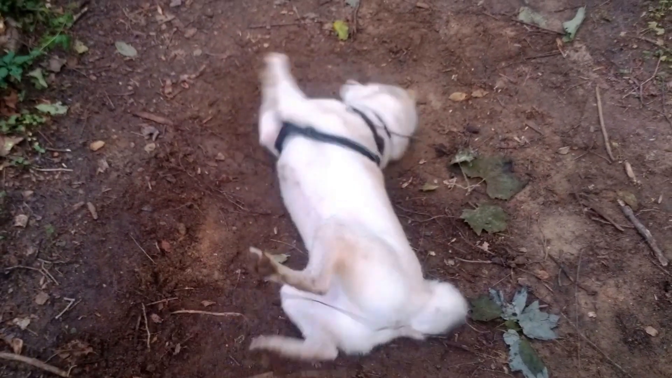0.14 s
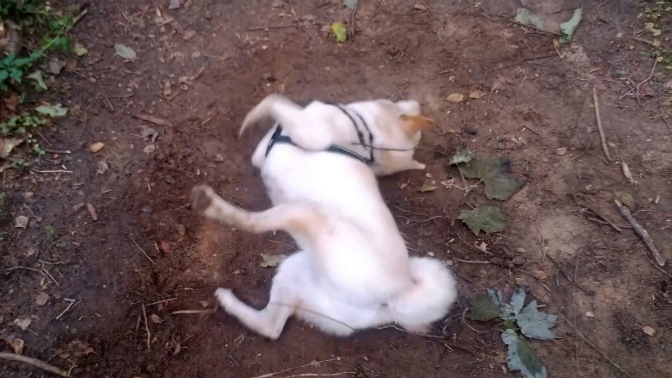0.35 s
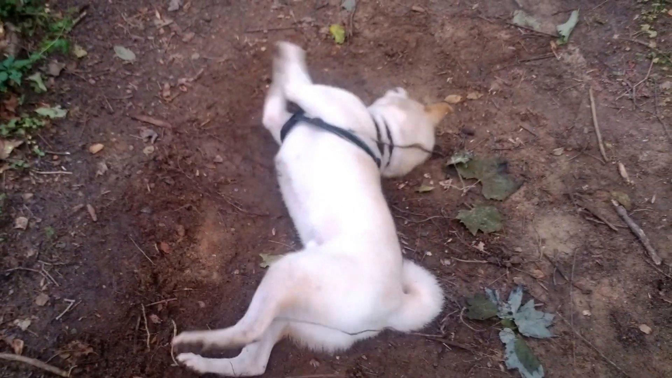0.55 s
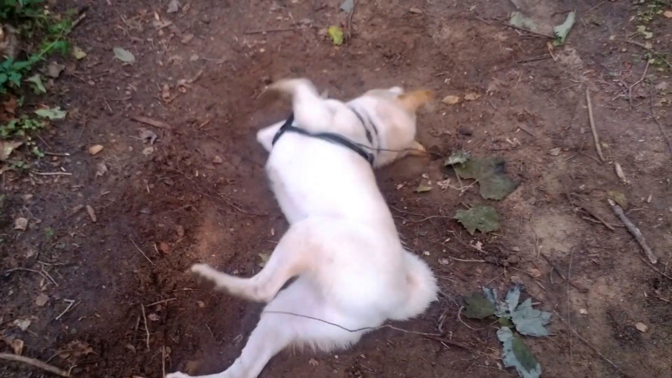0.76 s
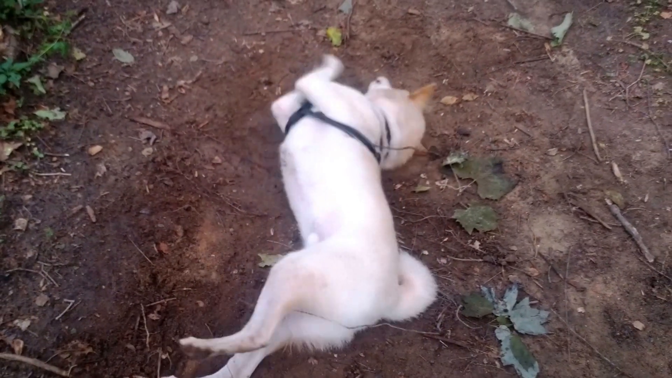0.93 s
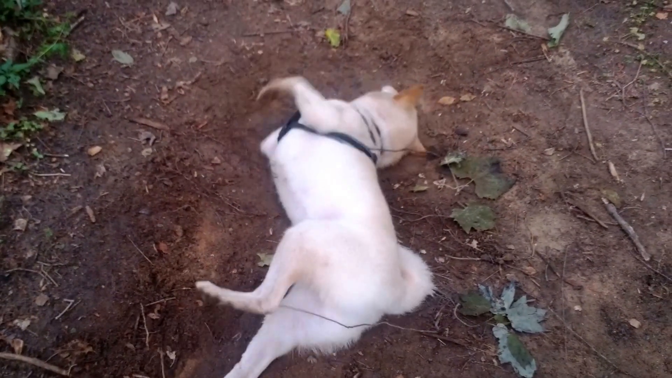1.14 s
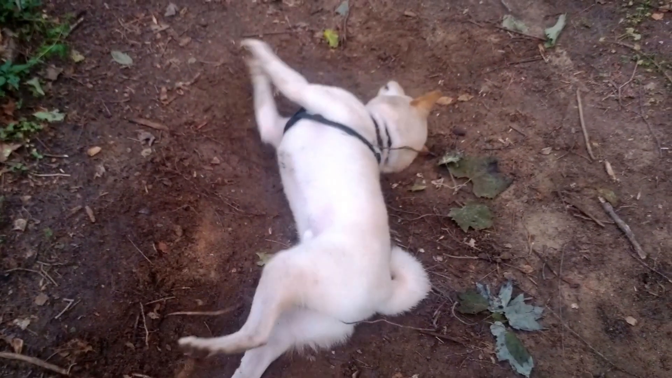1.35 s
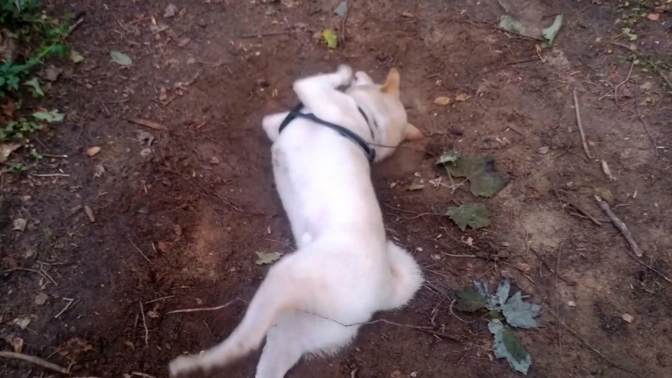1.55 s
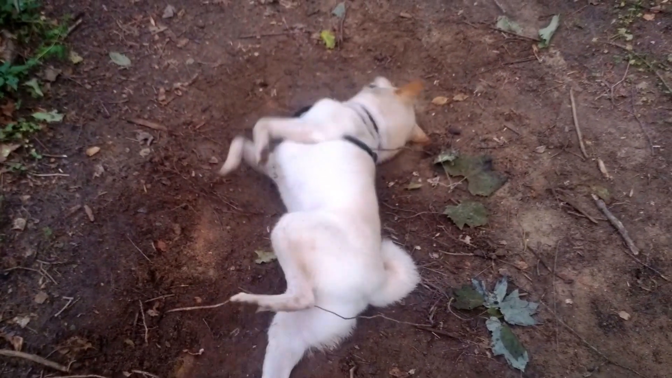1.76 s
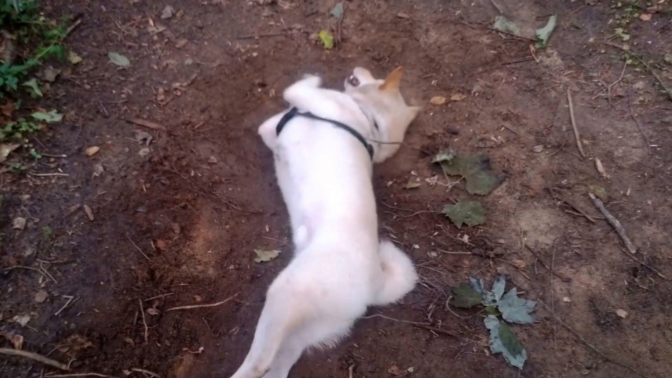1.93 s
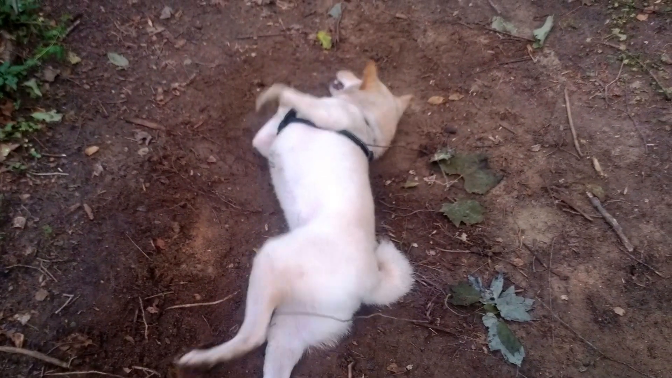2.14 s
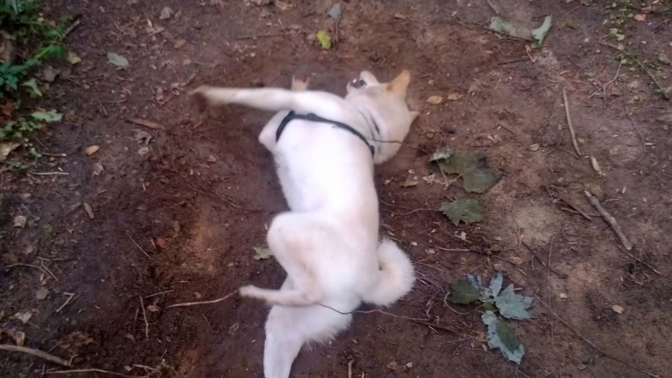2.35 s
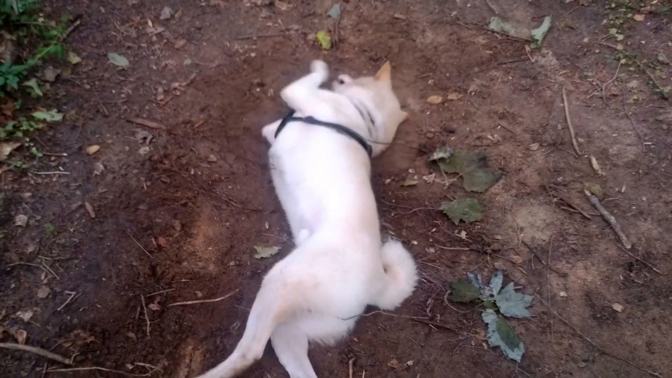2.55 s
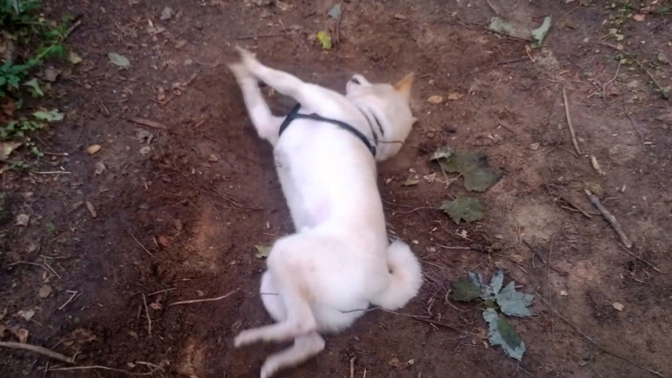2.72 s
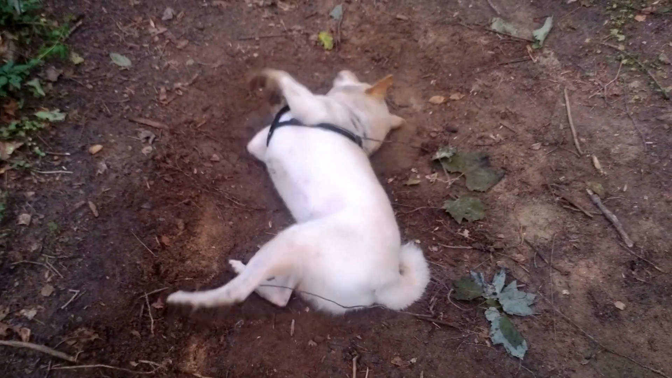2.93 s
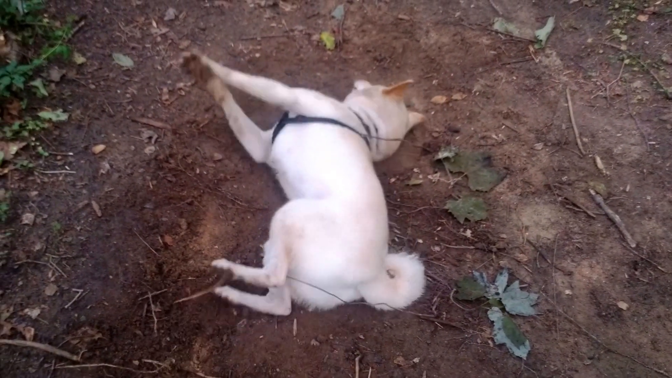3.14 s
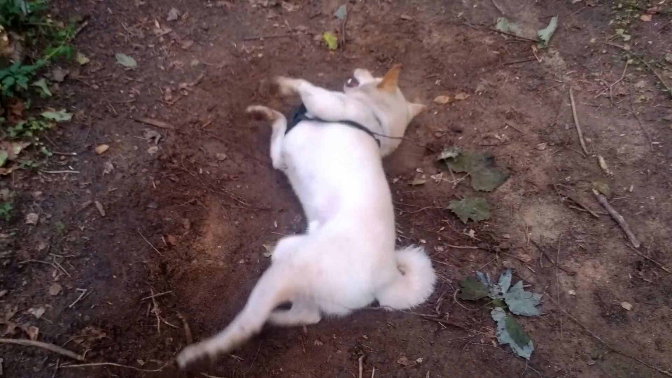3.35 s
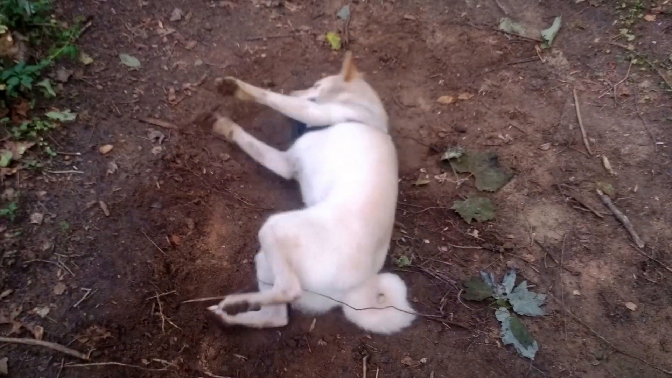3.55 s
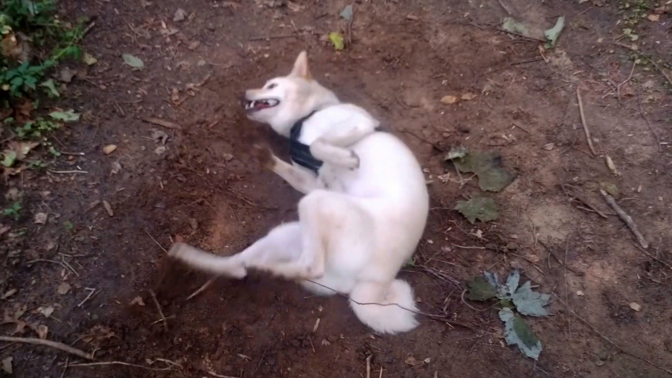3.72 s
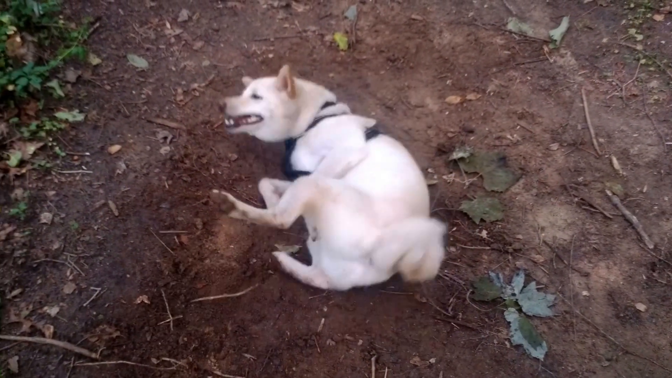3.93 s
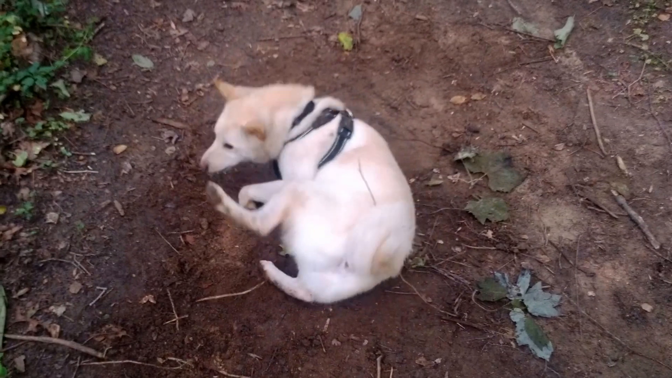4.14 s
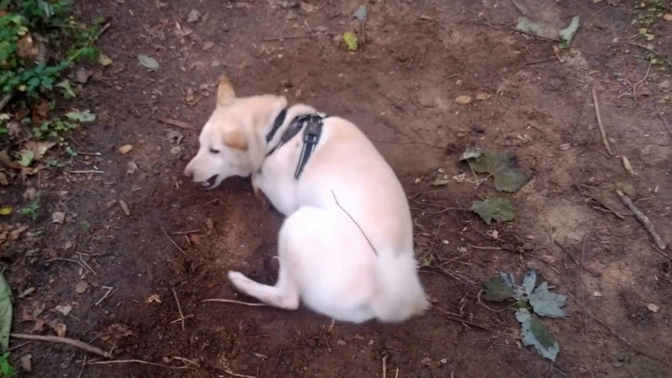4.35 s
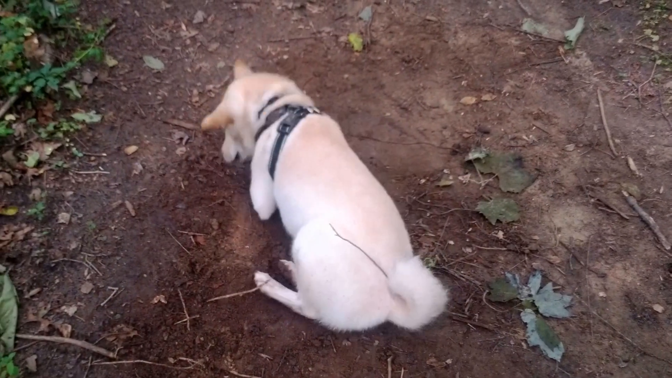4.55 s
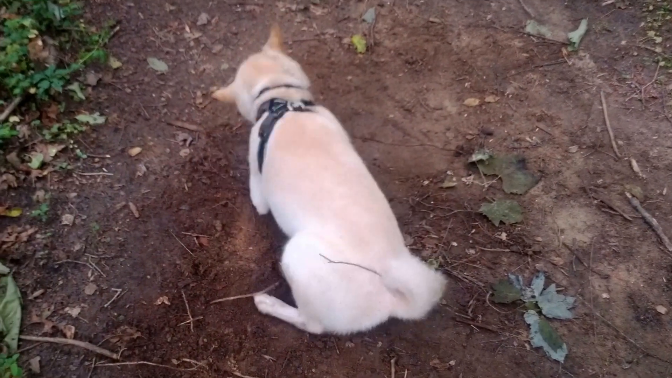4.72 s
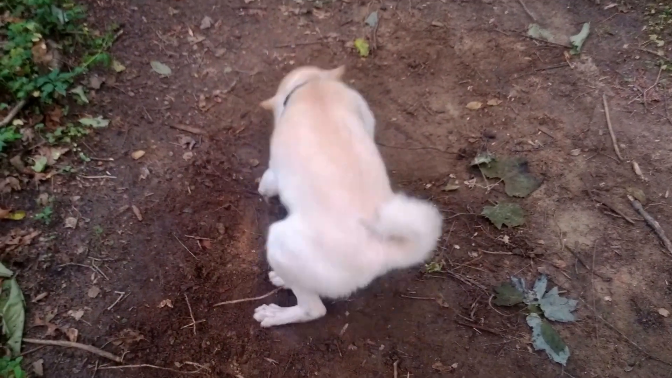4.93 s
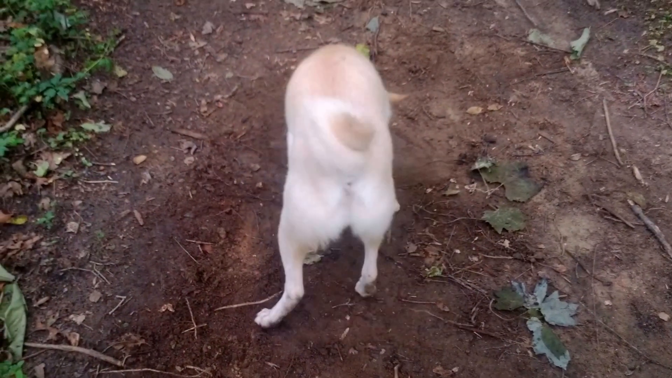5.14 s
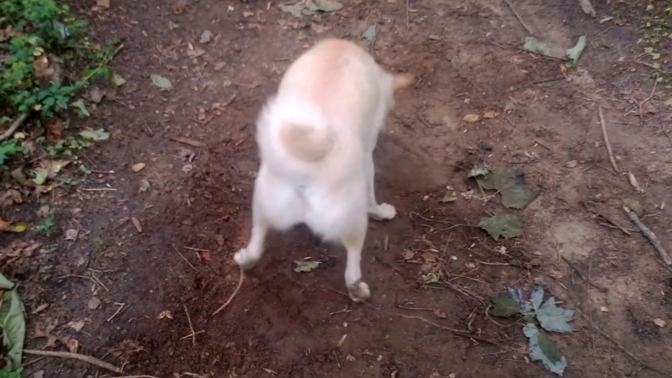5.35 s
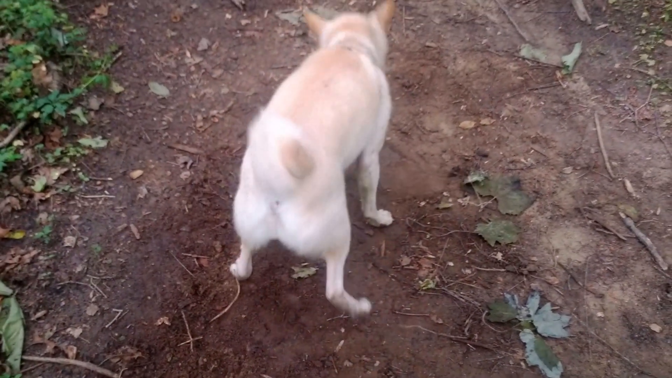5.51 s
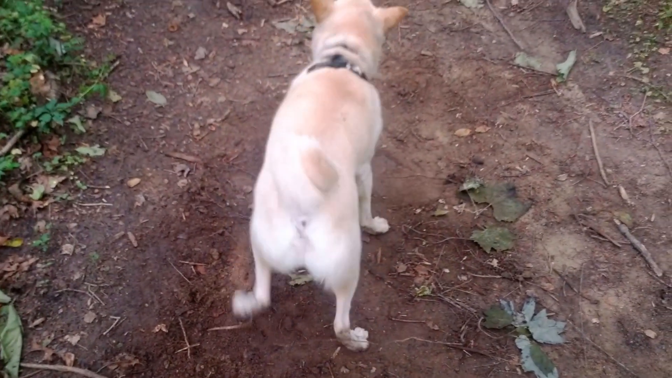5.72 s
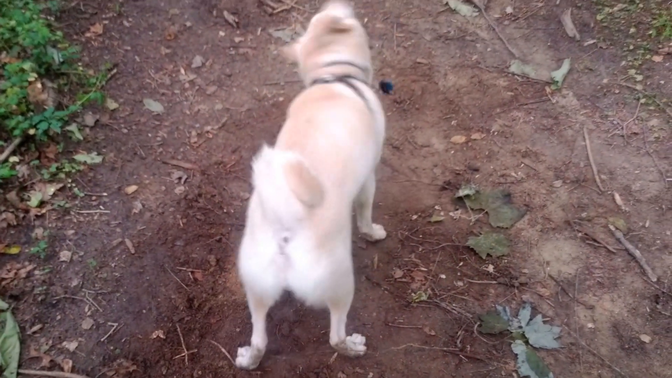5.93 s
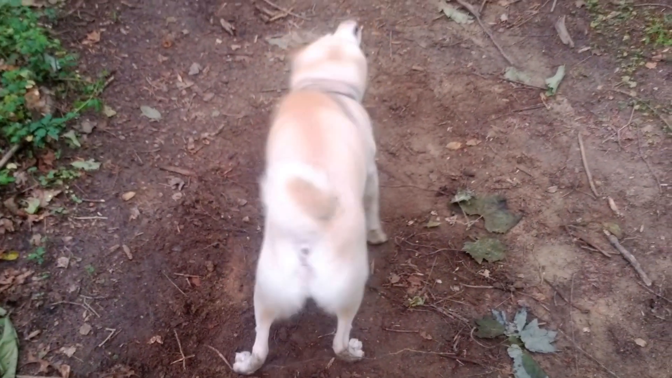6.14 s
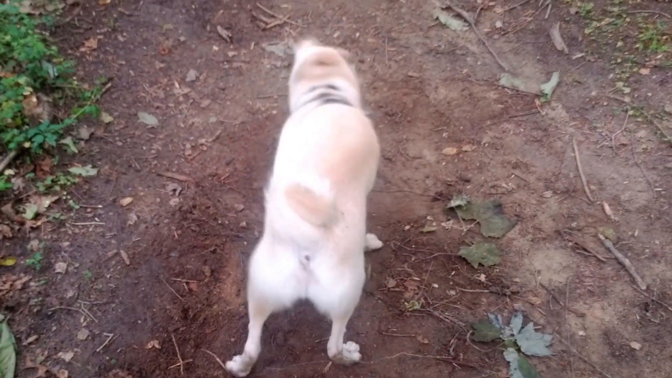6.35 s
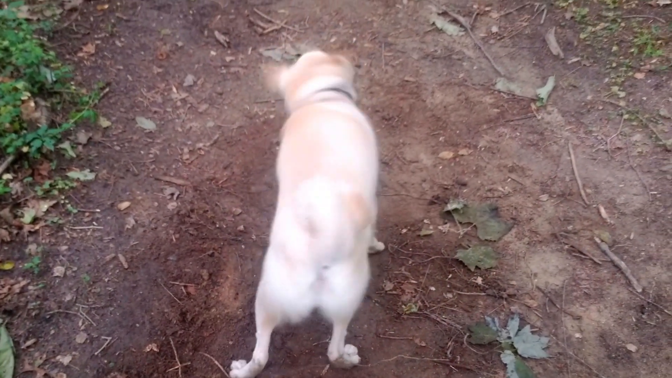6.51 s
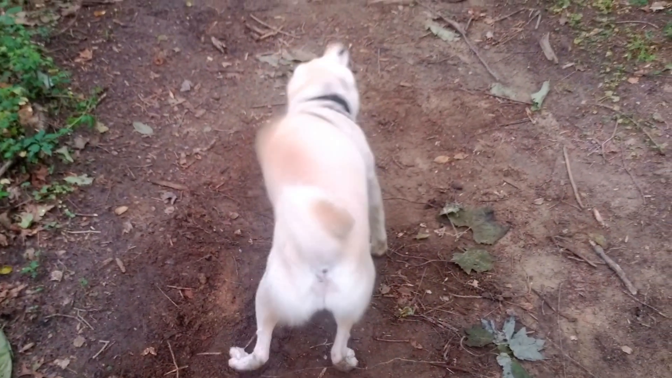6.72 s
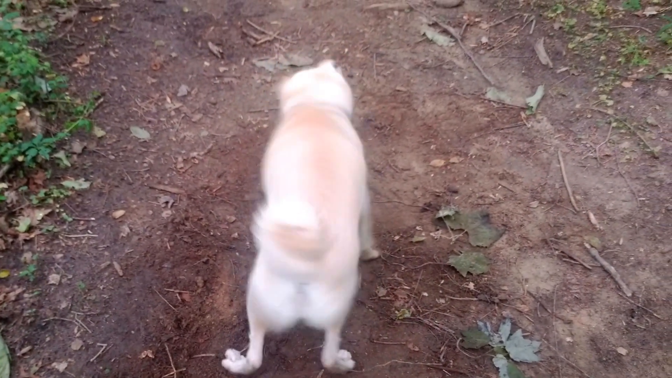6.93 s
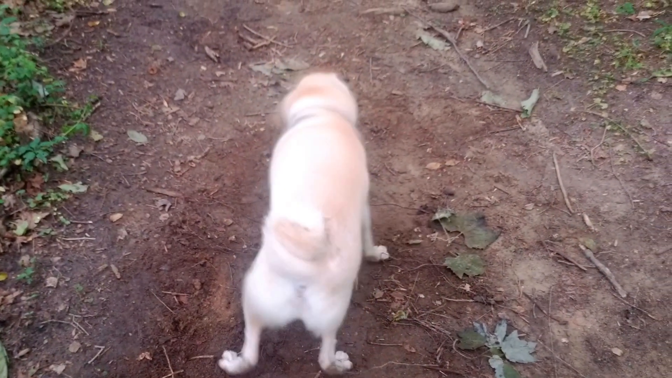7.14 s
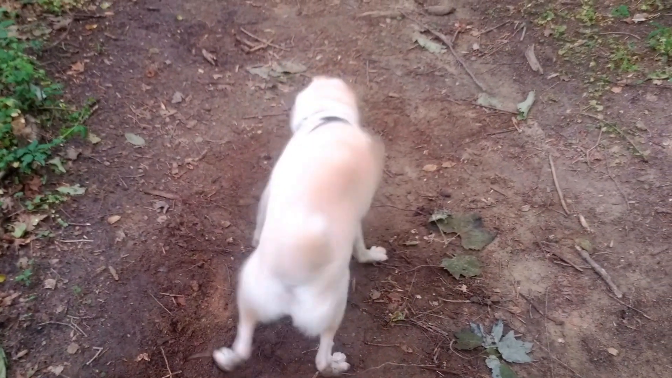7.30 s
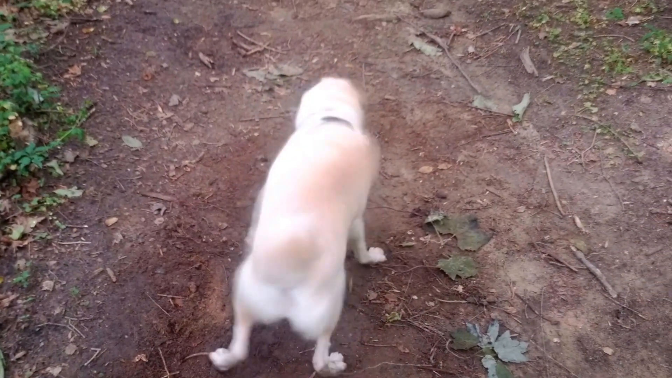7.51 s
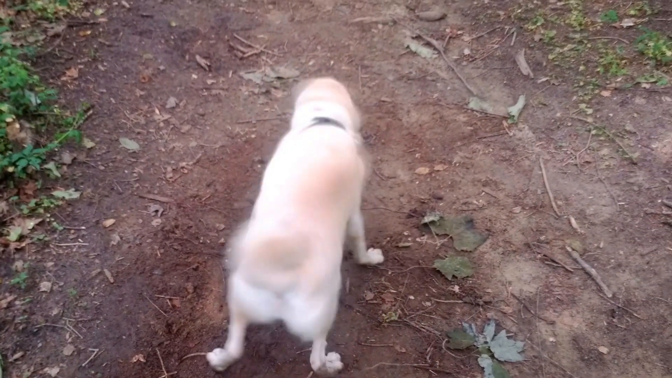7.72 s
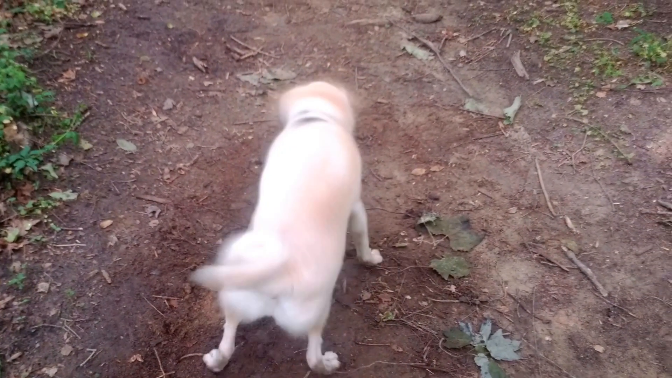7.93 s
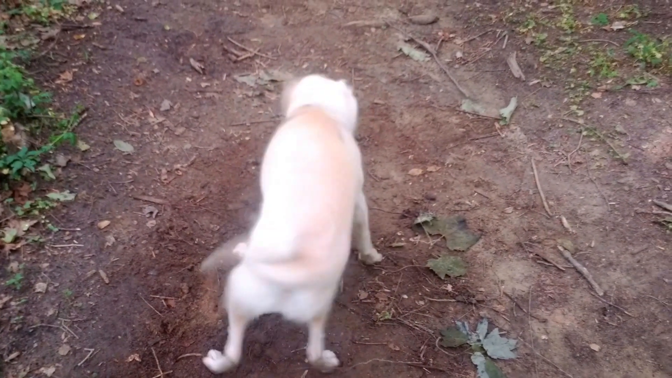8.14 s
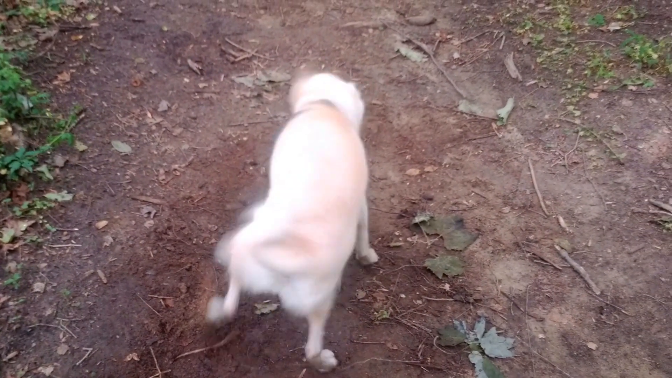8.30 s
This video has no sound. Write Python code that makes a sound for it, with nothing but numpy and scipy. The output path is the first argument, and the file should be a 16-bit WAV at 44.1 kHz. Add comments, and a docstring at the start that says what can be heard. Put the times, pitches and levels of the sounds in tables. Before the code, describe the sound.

Rough coat scuffs over dirt, small tag tinks and snorty puffs outdoors, followed by sharp, rhythmic rattling clacks of a dog's metal collar fittings.

```python
"""You hear a coat scraping over soil, twigs snapping, paws thumping, a collar tag tinkling and a dog snorting;
then the dog stands and its collar clacks in time with its movements. Filtered grains of noise make the coat,
soil and twigs; decaying sine waves make the tag; bursts of tiny contacts make the clacks; resonating noise makes
the snorts. Trees return a faint tail, over a low outdoor rumble, a distant drone and faint bands of noise."""
import sys
import numpy as np
from scipy import signal
from scipy.fft import rfft, irfft, next_fast_len
from scipy.io import wavfile
from scipy.ndimage import uniform_filter1d

SR = 44100
rng = np.random.default_rng(int(sys.argv[2]) if len(sys.argv) > 2 else 0)


def put_to_file(sound):
    """Save the sound as 16-bit audio at rate SR, in the file named by the first command-line argument."""
    columns = np.atleast_2d(sound).T  # one column per channel
    safe = np.clip(columns, -1, 1)
    whole_steps = np.round(safe * 32767)
    wavfile.write(sys.argv[1], SR, whole_steps.astype(np.int16))


N = 369116
TIME = np.arange(N) / SR

# Outdoor background colour. Each row: frequency in Hz, relative level in dB.
AIR_COLOUR = [(12, 6.5), (20, -16.5), (48, 3.5), (104, -1.5), (177, -8.5), (255, -19.5), (347, -20.5),
              (410, -27), (1090, -30), (1260, -34), (2460, -36), (5080, -30.5), (8890, -38.5), (14300, -37),
              (16000, -32.5)]
AIR_DB = -46  # before the hiss is thinned
# Faint narrow hiss bands. Each row: centre in Hz, width in Hz, middle level in dB, typical wander of the centre
# as a share of it, patchiness in dB (a minus sign turns the ups and downs over).
HISS_BANDS = [(1618, 254, -75.5, .04, -1), (4166, 420, -69.5, 0.023, 3), (5400, 710, -85, 0.061, 6),
              (7470, 1900, -72.5, 0.033, 11.5)]
# A faint far-off drone that comes and goes; the width is that of each of its two resonances.
DRONE_HZ, DRONE_WIDTH_HZ, DRONE_DB, DRONE_PATCHY_DB = 315, 32, -74, 3

# Strokes of the coat over the ground. Each row: peak time in seconds, rise in seconds, fall in seconds,
# level in dB before the lift in scuffs().
COAT_STROKES = [(.07, 0.099, 0.11, -58), (.455, 0.36, 0.11, -52.5), (.75, .07, 0.033, -54),
                (1.16, 0.089, 0.17, -55), (1.645, 0.17, 0.15, -43.5), (2.215, .09, 0.094, -53),
                (2.48, 0.025, 0.08, -50.5), (2.71, 0.13, 0.085, -60), (3.035, 0.055, 0.094, -34),
                (3.23, 0.16, 0.1, -47.5), (3.38, 0.052, 0.089, -55.5), (3.61, 0.12, 0.14, -52.5),
                (4.0, 0.043, 0.051, -47), (4.1, 0.025, 0.028, -50), (4.41, 0.025, 0.026, -49),
                (4.85, .06, 0.087, -57), (5.08, .03, 0.022, -55), (5.84, 0.027, .04, -52.5)]
# Heavy rolls that drag the body's weight through the soil. Each row: as for the coat strokes.
BODY_ROLLS = [(1.72, 0.069, 0.076, -48.5), (3.045, 0.048, 0.083, -37.5), (3.25, 0.14, 0.064, -46),
              (4.73, .17, 0.1, -68)]
# A stroke is EDGE_DB down one rise before and one fall after its peak; shape 1 is pointed, 2 is round.
EDGE_DB, SWELL_SHAPE = -11, 1.71
# Light unbroken contact, first of the coat, then of the paws. Each row: time in seconds, coat level in dB,
# soil level in dB (both before the lift in scuffs()).
LIGHT_CONTACT = [(0, -66.5, -74), (4.2, -60.5, -72), (5.3, -66.5, -96), (5.7, -73, -81.5),
                 (8.37, -71, -62.5)]
# Colour of dry crumbs and leaves. Each row: frequency in Hz, relative level in dB.
CRUMB_COLOUR = [(300, -3.5), (900, -4), (2400, -7), (4000, 0), (6500, -2), (8500, -2), (10500, 4.5),
                (13000, 5), (15500, -0.5)]
# Colour of dragged soil. Each row: frequency in Hz, relative level in dB.
SOIL_COLOUR = [(120, -2.5), (250, 7), (480, -37), (780, -7), (1200, -2), (1600, 0), (2400, -4), (3800, -2),
               (6500, -5), (9000, -5.5), (15000, -62)]

# Until ROLLING_S seconds the dog is on the ground, setting off faint cracks and pats at random.
ROLLING_S = 5.7
FAINT_CRACK_DB, FAINT_CRACK_HZ = -55, 6230
FAINT_PAT_DB, FAINT_PAT_HZ, FAINT_PAT_T60_S = -62, 574, 0.042  # level before the lift in thumps()
FAINT_SPREAD_DB = 3  # each may be up to this much louder or softer
# Twigs and dry leaves cracking. Each row: time in seconds, level in dB, pitch in Hz.
TWIG_CRACKS = [(0.193, -45.5, 3370), (1.2302, -31, 13000), (1.803, -46.5, 4970), (2.176, -49, 5040),
               (2.3666, -50, 11100), (2.4689, -51, 11300), (3.372, -46, 9350), (3.5, -53, 3200),
               (3.841, -50, 4150), (4.027, -38.5, 3170), (4.119, -49.5, 5970), (4.695, -55, 2620),
               (5.825, -49.5, 4730), (6.244, -43, 2200), (6.923, -41.5, 2300)]
# Colour of a crack. Each row: multiple of its pitch, relative level in dB.
CRACK_COLOUR = [(.25, -24), (.55, -7.5), (.8, 0.5), (1, 4), (1.3, -0.5), (2, -2), (4, -44)]
# Paws and flank striking soil. Each row: time in seconds, level in dB before the lift in thumps(),
# pitch in Hz, time to fade by 60 dB in seconds.
SOIL_BLOWS = [(0.462, -52, 940, 0.034), (1.182, -55, 660, 0.12), (1.628, -47.5, 920, 0.055),
              (1.71, -51.5, 690, 0.081), (1.738, -50, 624, 0.25), (1.792, -50, 280, .057),
              (2.721, -37.5, 610, 0.034), (3.009, -36.5, 523, 0.016), (3.061, -41, 700, .04),
              (3.177, -46, 830, 0.065), (3.202, -45, 890, 0.085), (3.243, -41.5, 620, 0.07),
              (3.912, -40, 305, 0.055), (4.068, -57, 450, .036), (4.73, -56, 320, .08),
              (8.122, -37.5, 304.1, 0.035)]

# The tag tapped on its own. Each row: time in seconds, level in dB before the trims in tinks(),
# strongest pitch in Hz.
TAG_TAPS = [(0.158, -41.5, 10100), (0.516, -36, 9860), (0.7962, -44.5, 9800), (1.113, -42.5, 10050),
            (1.172, -43, 9600), (1.4157, -39, 9860), (1.5644, -47, 11950), (1.8745, -42.5, 12050),
            (1.9433, -44, 12050), (6.009, -43.5, 9850), (7.433, -35, 10120), (7.6334, -35.5, 10200),
            (7.679, -38, 9620), (7.986, -30.5, 9730), (8.0567, -34.5, 13180), (8.244, -35, 6220),
            (8.244, -37, 9850), (8.358, -29, 10290)]
# The tag's ringing modes. Each row: frequency in Hz, relative level in dB, time to fade by 60 dB in seconds.
TAG_MODES = [(5130, -18, .25), (6290, 15, 0.041), (9800, 18, 0.082), (9660, -31, 0.16), (11500, 15, 0.1),
             (12130, -58, .3), (13400, 5, 0.14), (15150, 12, .2)]

# Thin, faint bands of gliding noise. Each row: start in seconds, length in seconds, level in dB,
# first pitch in Hz, last pitch in Hz.
GLIDING_BANDS = [(0.757, .32, -67.5, 4570, 4620), (1.918, 0.29, -62.5, 7270, 5800),
                 (2.8, 0.19, -62.5, 6040, 5650), (4.619, .4, -67, 5970, 7160),
                 (4.851, 0.99, -67, 5000, 5500)]
BAND_WIDTH_HZ, BAND_FADE_S = 360, .07

# The dog's snorts. Each row: start in seconds, length in seconds, level in dB before the swell and trim,
# first, second and third resonance in Hz, hiss in dB before its lift, throat in dB (against the muzzle).
SNORT_PUFFS = [(2.19, 0.17, -47.5, 1690, 1890, 4740, -38, -3.5),
               (2.71, 0.11, -58.5, 1510, 1900, 1940, -6.5, -1),
               (3.63, 0.13, -50, 2300, 3100, 3880, 3, -4.5),
               (3.965, 0.09, -41, 1450, 1760, 2700, -5.5, -29),
               (4.06, 0.085, -48.5, 1130, 1540, 3120, -33, -19),
               (4.361, .14, -39, 1390, 1560, 3260, -7.5, -4), (4.89, .14, -67.5, 1030, 1700, 3000, 1, 5.5),
               (5.33, 0.12, -56.5, 1040, 1690, 3200, -11, -7),
               (5.73, 0.13, -71.5, 1000, 1700, 3320, -21, 8.5)]
# Colour of the snorts' hiss. Each row: frequency in Hz, relative level in dB.
SNORT_HISS_COLOUR = [(200, 6.5), (450, 5), (720, -3), (1100, 3.5), (2500, 10), (4400, 7.5), (6000, 2.5),
                     (7200, 1), (8500, 0), (11500, -0.5), (15500, -7)]

# The collar's main blows. Each row: time in seconds, treble level in dB, body level in dB, knock level in dB,
# strongest treble pitch in Hz, lead of a grazing first touch in seconds (5 ms or less gives no such touch).
COLLAR_BLOWS = [(6.0982, -37, -38.5, -56, 11700, 0), (6.111, -24.5, -28.5, -48, 10240, 0.0066),
                (6.2465, -37, -63, -45, 11200, 0.0002), (6.3771, -21, -24.5, -42.5, 11600, 0.018),
                (6.65, -18, -30, -45.5, 9600, 0.024), (6.7937, -36.5, -55, -52, 9600, 0.0011),
                (6.9138, -19.5, -24, -41, 9900, .013), (7.0152, -35, -50, -53.5, 12600, 0),
                (7.1511, -24, -32.5, -40, 9600, .017), (7.3671, -21, -24, -40.5, 9800, 0.013),
                (7.4723, -24, -38, -38.5, 13650, 0), (7.5808, -31, -34, -51, 9900, .019),
                (7.777, -21.5, -28.5, -44.5, 9840, .017), (7.963, -37, -32.5, -50, 9990, 0.015),
                (7.9837, -29, -38, -50.5, 9600, 0.00072), (8.1487, -12, -24.5, -41, 12200, 0.022),
                (8.2431, -22, -50, -52, 13850, 0.0026), (8.3208, -14, -22.5, -44.5, 15080, 0.0069)]
# High part of the metal's rattle. Each row: frequency in Hz, relative level in dB.
TREBLE_COLOUR = [(3000, -41), (7000, -16), (8800, -6.5), (9800, 1.5), (10800, 0.5), (11800, -1), (12700, 0),
                 (13800, -6), (14500, 6.5), (15300, -21), (16500, -13.5)]
# Middle part of the metal's rattle. Each row: frequency in Hz, relative level in dB.
BODY_COLOUR = [(2500, -29), (3500, -14.5), (4200, -4), (5150, -1), (5900, -4.5), (6800, -7.5), (9000, -17)]
# Low part of the metal's rattle. Each row: frequency in Hz, relative level in dB.
KNOCK_COLOUR = [(200, -11), (600, -2.5), (1500, 3), (2600, 6.5), (4000, 9), (7000, -69)]
REBOUND_S, REBOUND_DB = .008, -19.5  # the metal bounces back once
# The light first touch at the first blow's time. One row: treble level in dB, body level in dB, knock level in dB.
GRAZE_LEVELS = (-41, -44, -60.5)
VIGOUR_DB_PER_S = 4.5  # first touches grow as the standing dog moves more briskly
SWISH_LEAD_S, SWISH_S = .028, .065  # the dog's movement comes just ahead of the clack that it causes
SWISH_DB, SWISH_GROWTH_DB_PER_S = -62, 3  # level at the first blow before shaping; movements grow more vigorous
BACKSWING_GAP_S = .15  # a longer pause between clacks holds a swing back on which the metal does not meet

# Colour of the trees' tail. Each row: frequency in Hz, relative level in dB.
TREE_COLOUR = [(500, -21), (3000, 3.5), (5200, -3.5), (7500, 3), (10000, -4), (12500, -1), (15000, 3)]
TOP_HZ = 15700  # the recorder's upper limit


def undb(db):
    """Turn decibels into a gain."""
    return 10 ** (np.asarray(db) / 20)


def unit(x):
    """Scale to an average strength (rms) of 1."""
    return x / np.sqrt(np.mean(x ** 2) + 1e-20)


def struck(x, db):
    """Scale a blow so that its first 8 ms have this level."""
    head = x[:int(.008 * SR)]
    return x * undb(db) / np.sqrt(np.mean(head ** 2) + 1e-20)


def curve(rows):
    """Draw a gain over time through (seconds, dB) rows."""
    return undb(np.interp(TIME, *np.transpose(rows)))


def add(out, s, x):
    """Mix x into out from s seconds on."""
    i = max(int(s * SR), 0)
    out[i:i + len(x)] += x[:max(N - i, 0)]


def colour(x, points, size=2048):
    """Filter through (Hz, dB) points without any sound ahead of its cause."""
    hz, db = np.transpose(points)
    grid = np.maximum(np.fft.rfftfreq(size, 1 / SR), 1)
    log_gain = np.log(undb(np.interp(np.log(grid), np.log(hz), db)))
    # Folding the cepstrum onto its first half makes the filter minimum-phase.
    cepstrum = irfft(log_gain)
    cepstrum[1:size // 2] *= 2
    cepstrum[size // 2 + 1:] = 0
    response = irfft(np.exp(rfft(cepstrum)))
    return signal.fftconvolve(x, response)[:len(x)]


def resonate(x, hz, width_hz):
    """Pass x through one resonance, with gain 1 at its centre."""
    hz = min(hz, .45 * SR)
    return signal.lfilter(*signal.iirpeak(hz, hz / min(width_hz, SR / 4), fs=SR), x)


def soft_band(n, width_hz):
    """Make low noise that becomes a band of this width when multiplied by a tone."""
    lowpass = signal.butter(3, width_hz / 2, fs=SR, output="sos")
    return signal.sosfilt(lowpass, rng.standard_normal(n))


def fade(t, t60):
    """Die away exponentially, 60 dB down after t60 seconds."""
    return np.exp(-np.log(1000) * t / t60)


def walk(rate):
    """Wander smoothly at random around 0, with an rms of about 1."""
    k = max(int(SR / rate), 2)
    steps = np.repeat(rng.standard_normal(N // k + 1), k)
    return unit(uniform_filter1d(steps, k)[:N])


def grains(n, rate, spread_db):
    """Scatter tiny impacts at random, rate per second; any spread makes a few much larger than the rest."""
    hit, size, sign = rng.random(n), rng.exponential(size=n), rng.standard_normal(n)
    size = np.minimum(size, 5)
    return unit((hit < rate / SR) * undb(spread_db * size) * np.sign(sign))


def chatter(t, t60, bounce_db, bounce_t60):
    """Two hard things meet: a dense burst of contacts, with sparser, weaker rebounds."""
    burst = grains(len(t), rate=8800, spread_db=3.0) * fade(t, t60)
    bounces = grains(len(t), rate=870, spread_db=3) * fade(t, bounce_t60)
    return burst + undb(bounce_db) * bounces


def outdoors():
    """Low rumble and soft hiss, with faint narrow hiss bands that drift in pitch, come and go."""
    air = unit(colour(rng.standard_normal(N), AIR_COLOUR, size=8192))
    air = air * undb(AIR_DB + 0.12 * walk(3.03))
    air = air - 0.19 * resonate(air, 4300, 3200)  # the broad hiss is thinner around 4300 Hz
    for hz, width, db, wander, patchy_db in HISS_BANDS:
        band = soft_band(N, width)
        phase = 2 * np.pi * np.cumsum(hz * (1 + wander * walk(3.7))) / SR
        patches_db = patchy_db * np.tanh(2 * walk(6.4))
        air = air + unit(band * np.sin(phase)) * undb(db + patches_db)
    return air


def drone():
    """Noise through two equal resonances makes a faint, narrow, low drone in the distance."""
    band = resonate(rng.standard_normal(N), DRONE_HZ, DRONE_WIDTH_HZ)
    band = resonate(band, DRONE_HZ, DRONE_WIDTH_HZ)
    return unit(band) * undb(DRONE_DB + DRONE_PATCHY_DB * np.tanh(walk(0.78)))


def swells(rows):
    """Gain over time of separate strokes, each rising to its peak and falling away; their powers add."""
    power = np.zeros(N)
    for s, rise, fall, db in rows:
        near = slice(max(int((s - 4 * rise) * SR), 0), int((s + 4 * fall) * SR))
        away = np.maximum((s - TIME[near]) / rise, (TIME[near] - s) / fall)
        power[near] += undb(db + EDGE_DB * away ** SWELL_SHAPE) ** 2
    return np.sqrt(power)


def scuffs():
    """Dry crumbs and leaves crackle under the coat; with weight on them the soil grinds in jerks and clods crunch."""
    crumbs = unit(colour(grains(N, rate=3500, spread_db=1.5), CRUMB_COLOUR))
    crumbs = crumbs * undb(2.04 * walk(90))
    soil = colour(grains(N, rate=2900, spread_db=0.0), SOIL_COLOUR)
    for hz in (800, 1550, 3800):  # each scraping resonance swells and fades on its own
        soil = soil + resonate(soil, hz, 0.24 * hz) * undb(-8 + 3.8 * walk(33))
    soil = unit(soil) * undb(0.63 * walk(90))
    clods = resonate(grains(N, rate=120, spread_db=3.0), 740, 490)
    clods = unit(resonate(clods, 710, 950))
    light_coat = curve([(s, coat_db) for s, coat_db, _ in LIGHT_CONTACT])
    light_soil = curve([(s, soil_db) for s, _, soil_db in LIGHT_CONTACT])
    brushing = np.hypot(swells(COAT_STROKES), light_coat)
    dragging = np.hypot(swells(BODY_ROLLS), light_soil)
    return undb(2.0) * crumbs * brushing + (undb(2.0) * soil + undb(-7) * clods) * dragging


def scattered(db, hz, count, octaves):
    """Random (seconds, dB, Hz) rows for small things disturbed while the dog rolls."""
    when, size, pitch = rng.random((count, 3)).T
    levels_db = db + FAINT_SPREAD_DB * (2 * size - 1)
    pitches_hz = hz * 2 ** (octaves * (2 * pitch - 1))
    return list(zip(ROLLING_S * when, levels_db, pitches_hz))


def tinks():
    """The hanging tag is tapped and rings in its modes, in a slightly different mix at every tap."""
    out, t = np.zeros(N), np.arange(SR // 3) / SR
    hz, db, t60 = np.transpose(TAG_MODES)[:, :, None]
    for s, level_db, spot_hz in TAG_TAPS:
        size_chance, pitch_chance = rng.standard_normal((2, len(TAG_MODES), 1))
        favour_db = 16.0 * np.exp(-((hz - spot_hz) / 500) ** 2)  # modes near the strongest pitch
        size = undb(db + 4.9 * size_chance + favour_db)
        tones = np.sin(2 * np.pi * hz * (1 + 0.0051 * pitch_chance) * t)
        ring = (size * fade(t, t60) * tones).sum(0)
        tap = colour(chatter(t, t60=0.015, bounce_db=-35, bounce_t60=0.071), TREBLE_COLOUR)
        tap = tap + 4 * resonate(tap, spot_hz, width_hz=120)
        add(out, s, struck(ring, level_db - 5) + struck(tap, level_db - 3))
    return out


def twigs(cycles=95):
    """Short dry cracks, each with one broad resonance; the smaller the twig, the higher and shorter."""
    out, t = np.zeros(N), np.arange(SR // 12) / SR
    faint = scattered(FAINT_CRACK_DB, FAINT_CRACK_HZ, count=8, octaves=1.6)
    for s, db, hz in TWIG_CRACKS + faint:
        crack = chatter(t, t60=cycles / hz, bounce_db=-25, bounce_t60=0.093)
        add(out, s, struck(colour(crack, np.array(CRACK_COLOUR) * [hz, 1]), db))
    return out


def thumps():
    """Blows on packed earth: a damped knock, narrower the longer it lasts, with the body's weight beneath it."""
    out, t = np.zeros(N), np.arange(SR // 4) / SR
    pats = scattered(FAINT_PAT_DB, FAINT_PAT_HZ, count=8, octaves=0.4)
    soft_contact = np.sin(np.pi / 2 * np.minimum(t / .002, 1)) ** 2  # a 2 ms onset
    for s, db, hz, t60 in SOIL_BLOWS + [(*pat, FAINT_PAT_T60_S) for pat in pats]:
        width = hz * .036 / t60
        earth = resonate(rng.standard_normal(len(t)), hz, width)
        earth = unit(resonate(earth, hz, width))
        weight = undb(-6.5) * np.sin(2 * np.pi * 0.564 * hz * t) * fade(t, 0.025)
        add(out, s, (earth * fade(t, t60) + weight) * soft_contact * undb(db + 7.0))
    return out


def gliding_bands():
    """Thin, faint bands of noise, each gliding slowly in pitch: low noise multiplied by a gliding tone."""
    out = np.zeros(N)
    for s, length, db, first_hz, last_hz in GLIDING_BANDS:
        t = np.arange(int(length * SR)) / SR
        band = soft_band(len(t), BAND_WIDTH_HZ)
        phase = 2 * np.pi * np.cumsum(np.linspace(first_hz, last_hz, len(t))) / SR
        ends = np.clip(np.minimum(t, length - t) / BAND_FADE_S, 0, 1)
        add(out, s, unit(band * np.sin(phase)) * ends * undb(db))
    return out


def snorts():
    """Puffs of air through the dog's muzzle: quick swell, three resonances, a low throat band, a fluttering hiss."""
    out, flutter = np.zeros(N), undb(1.6 * walk(130))
    for s, length, db, *formants, hiss_db, throat_db in SNORT_PUFFS:
        u = np.linspace(0, 1, int(length * SR))  # progress through the snort
        air = rng.standard_normal(len(u))
        muzzle = np.zeros(len(u))
        for hz in formants:
            narrow = resonate(air, hz, 100 + 0.23 * hz)
            muzzle += unit(resonate(narrow, hz, 300 + 0.68 * hz))
        throat = unit(resonate(resonate(air, 670, 420), 1010, 890))
        hiss = unit(colour(air, SNORT_HISS_COLOUR))
        puff = unit(muzzle) + undb(throat_db) * throat + undb(hiss_db + 7.0) * hiss
        swell = np.interp(u, [0, .18, .45, .68, 1], [0, 0.87, 1.0, 0.37, 0.23])
        swell = swell * np.linspace(1.25, .6, len(u))  # the air runs out
        add(out, s, puff * swell * undb(db - 2.5))
    return out * flutter


def loose_links():
    """Once the dog stands, small collar parts keep ticking between the clacks, each tick a few ms long."""
    motion = curve([(0, -104), (5.9, -65), (6.15, -52), (7.2, -50.5), (8.37, -50.5)])
    t = np.arange(SR // 40) / SR
    tick = rng.standard_normal(len(t)) * fade(t, 0.017)
    ticks = signal.fftconvolve(grains(N, rate=150, spread_db=3.7), tick)[:N]
    return unit(colour(ticks, TREBLE_COLOUR)) * motion


def swishes():
    """The standing dog sways to and fro: a brief soft rub ahead of each clack and on each silent swing back."""
    out, swell = np.zeros(N), np.hanning(int(SWISH_S * SR))
    hits = np.array(COLLAR_BLOWS)[:, 0]
    gaps = np.diff(hits)
    backswings = (hits[:-1] + gaps / 2)[gaps > BACKSWING_GAP_S]
    for s in [*hits, *backswings]:
        rub = resonate(grains(len(swell), rate=2500, spread_db=5.5), 1100, 570)
        rub = unit(resonate(rub, 1430, 3900))
        level_db = SWISH_DB + SWISH_GROWTH_DB_PER_S * (s - hits[0])
        add(out, s - SWISH_LEAD_S - SWISH_S / 2, rub * swell * undb(level_db))
    return out


def collisions():
    """Each blow has a rebound and may have a grazing first touch: (seconds, three levels in dB, pitch in Hz)."""
    for s, *levels_db, hz, lead_s in COLLAR_BLOWS:
        yield s, levels_db, hz
        yield s + REBOUND_S, np.add(levels_db, REBOUND_DB), hz
        if lead_s > .005:
            vigour_db = VIGOUR_DB_PER_S * (s - COLLAR_BLOWS[0][0])
            yield s - lead_s, np.add(GRAZE_LEVELS, vigour_db), hz


def clacks():
    """Clasp and ring collide: a hard snap, then a damped rattle; each spot that is hit favours its own resonances."""
    out, t = np.zeros(N), np.arange(SR // 6) / SR
    snap = 1 + 1.3 * fade(t, .007)
    for s, (treble_db, body_db, knock_db), hz in collisions():
        push = snap * chatter(t, t60=0.047, bounce_db=-17, bounce_t60=0.16)
        treble = colour(push, TREBLE_COLOUR)
        treble = treble + 1.34 * resonate(treble, hz, width_hz=550)
        body_push = snap * chatter(t, t60=0.026, bounce_db=-4, bounce_t60=0.072)
        body = colour(body_push, BODY_COLOUR)
        body = body + .8 * resonate(body, rng.uniform(4700, 5800), width_hz=650)
        knock = colour(push, KNOCK_COLOUR)
        add(out, s, struck(treble, treble_db) + struck(body, body_db) + struck(knock, knock_db))
    return out


def blur(x, spread_hz=260):
    """Scatter from many surfaces smears the metal's pitches, here by shifting them at random."""
    phase = 2 * np.pi * np.cumsum(spread_hz * walk(900)) / SR
    return np.real(signal.hilbert(x, next_fast_len(N))[:N] * np.exp(1j * phase))


def trees(x, t60=1.0, near_t60=0.22, near_db=3, wet_db=-11, build_s=0.021):
    """Near bushes and farther trunks scatter a thin, grainy tail back."""
    t = np.arange(SR) / SR
    decay = fade(t, t60) + undb(near_db) * fade(t, near_t60)
    build_up = 1 - np.exp(-t / build_s)
    tail = grains(len(t), rate=3900, spread_db=1.5) * decay * build_up
    tail = colour(tail / np.linalg.norm(tail), TREE_COLOUR)
    return undb(wet_db) * signal.fftconvolve(x, tail)[:N]


def scene():
    """Collar, ground and dog, heard directly and from the trees, over the outdoor background."""
    background = outdoors() + drone() + gliding_bands()
    ground = scuffs() + twigs() + thumps() + snorts() + swishes()
    collar = tinks() + loose_links() + clacks()
    tail = trees(blur(collar) + undb(-14.0) * ground)
    return (collar + ground + tail + background)[None]


def record(dry):
    """The recorder rounds only the tallest peaks and cuts the top."""
    rounded = dry / (1 + (dry / .66) ** 6) ** (1 / 6)
    return signal.sosfilt(signal.ellip(8, .2, 70, TOP_HZ, fs=SR, output="sos"), rounded)


dry = scene()
out = record(dry)
put_to_file(out)
```